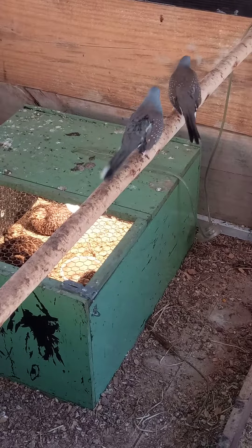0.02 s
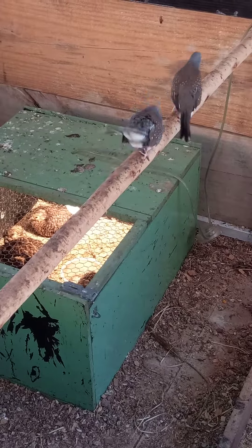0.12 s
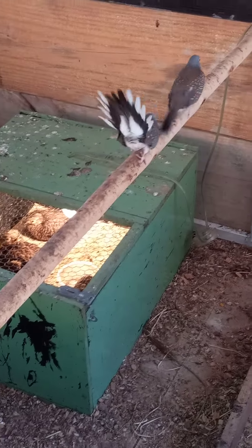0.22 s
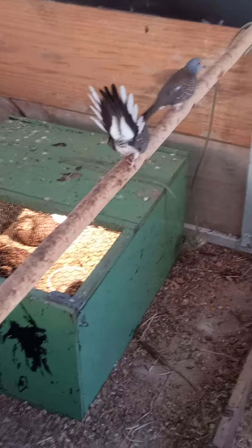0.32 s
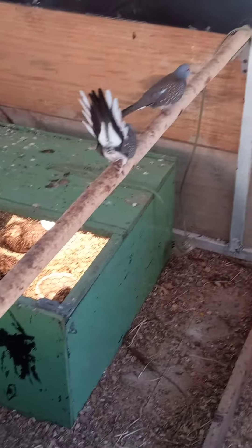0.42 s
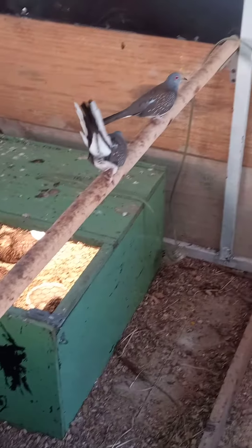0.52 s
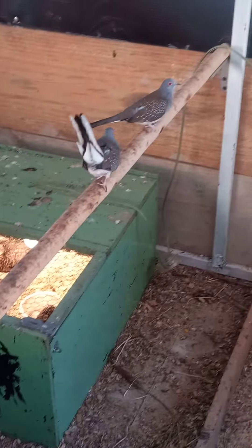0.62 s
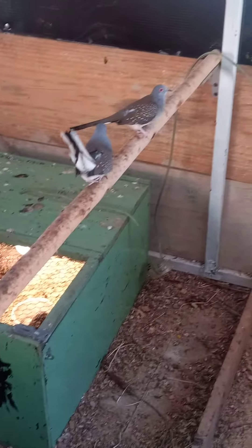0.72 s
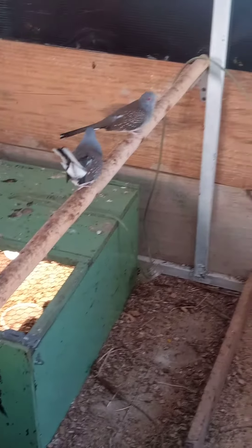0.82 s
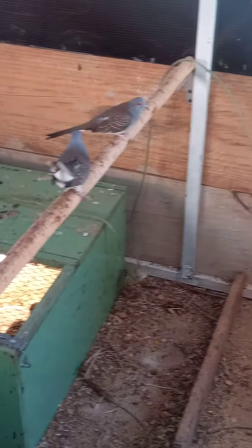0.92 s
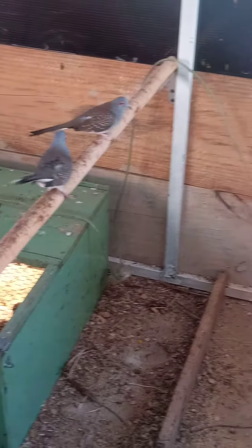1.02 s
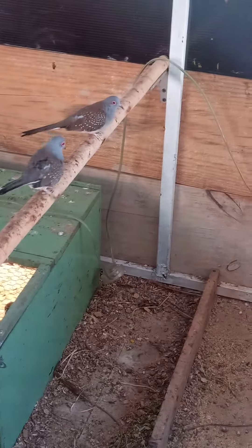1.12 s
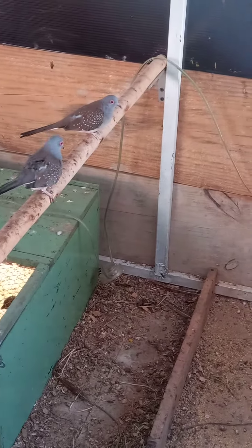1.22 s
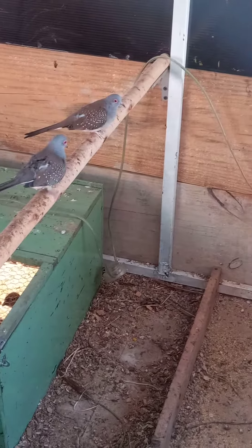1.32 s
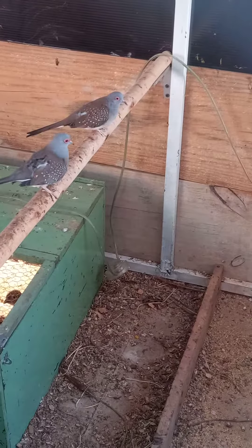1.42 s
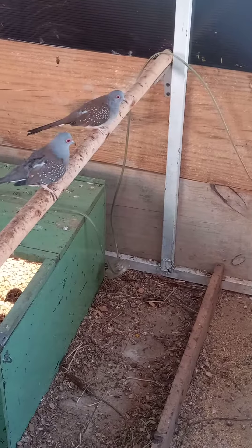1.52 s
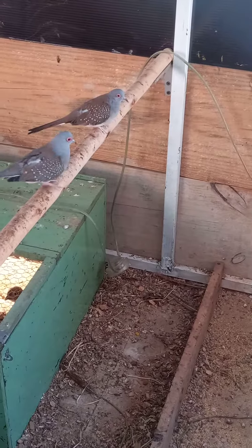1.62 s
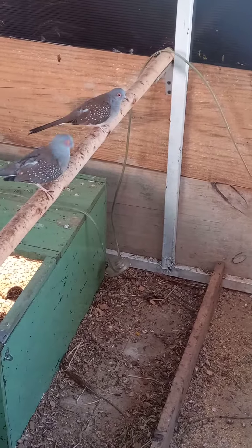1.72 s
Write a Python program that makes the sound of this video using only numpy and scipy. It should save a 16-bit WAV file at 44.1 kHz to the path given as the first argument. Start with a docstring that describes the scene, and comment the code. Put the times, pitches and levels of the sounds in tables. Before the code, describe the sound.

A small dove close by gives one high coo, rough, then pure, then rough and falling, in a small wooden aviary; another dove hums before it, with light perch knocks, a feather rush and distant small birds' whistles.

```python
"""In a wooden aviary a small dove gives one coo: a rough start, a pure held note, a rough falling end.
The coo is two beating tones, jittered where rough and filtered by the throat. Perch knocks are noise
bursts with ringing modes, thumps are low swelling sines, feathers are shaped noise. Small birds give
swept whistles and raspy chips further off, another dove hums faintly, and rumble lies under it all."""
import sys
import numpy as np
from scipy import signal
from scipy.fft import rfft, irfft, next_fast_len
from scipy.io import wavfile
from scipy.ndimage import map_coordinates

SR = 44100
rng = np.random.default_rng(int(sys.argv[2]) if len(sys.argv) > 2 else 0)


def unload_wav(signal):
    """Save mono or channel-first audio to the path in sys.argv[1] as 16-bit WAV at rate SR, clipped to [-1, 1]."""
    wavfile.write(
        sys.argv[1],
        SR,
        np.round(np.clip(np.atleast_2d(signal).T, -1, 1) * 32767).astype(np.int16),
    )


N = 79380  # samples

# low rumble: spectrum (pitch_hz, relative_db) and course (time_s, level_db)
RUMBLE_SPECTRUM = [(20, -43.5), (40, -18), (75, 0.5), (110, -4), (145, -5.5), (190, -10), (400, -16),
                   (700, -22), (1200, -26), (3000, -48)]
RUMBLE_LEVEL = [(0, -67.5), (.3, -63), (.75, -65.5), (1.1, -73), (1.8, -72.5)]
# air noise: spectrum (pitch_hz, relative_db) and course (time_s, level_db)
AIR_SPECTRUM = [(300, -6), (1000, -6), (1400, -5), (2100, 6), (2350, 0), (2700, -9.5), (3200, -12.5),
                (4300, -3.5), (5300, -14.5), (6800, -9.5), (7400, -28), (15000, -27.5)]
AIR_LEVEL = [(0, -78.5), (.15, -85), (.3, -72.5), (.9, -70), (1.15, -75.5), (1.5, -73.5), (1.8, -76)]
# steady microphone hiss: spectrum (pitch_hz, relative_db)
HISS_SPECTRUM = [(3000, -17.5), (7000, -7.5), (7500, -6.5), (10000, -3.5), (13000, 3), (15500, -1)]
HISS_DB = -87.5

# small birds' slurred whistles, level before the reverberation
# (start_s, length_s, start_hz, end_hz, level_db, warble_share_of_pitch)
WHISTLES = [(-.015, 0.039, 5010, 5100, -75.5, 0.031), (0.295, 0.057, 4597, 4060, -63.5, 0.056),
            (0.632, 0.07, 4600, 4123, -60, 0.072), (0.671, 0.066, 3720, 3500, -67, 0.075),
            (0.789, 0.055, 4593, 4100, -63, .08), (1.38, 0.075, 4480, 4150, -65, .055),
            (1.45, 0.077, 3780, 3420, -73.5, .07), (1.472, 0.04, 4320, 4280, -68.5, .022),
            (1.582, 0.049, 4310, 4500, -71.5, .05), (1.572, 0.06, 3600, 3517, -77.5, 0.046)]
# their short raspy chips (start_s, level_db, gain_of_lower_resonance_db)
CHIPS = [(.292, -77, -13), (0.475, -68, -12.5), (0.766, -64.5, 2.5), (0.906, -77.5, 6.5), (1.034, -70.5, 5),
         (1.329, -67, 3.5), (1.592, -80, -5)]
# noise spectrum of the chips (pitch_hz, relative_db)
CHIP_SPECTRUM = [(2500, -33.5), (3800, -10), (4500, -3.5), (5300, -12), (5900, -14), (6170, 2), (6500, -10),
                 (6850, -5), (7300, -23), (8600, -20.5), (10000, -26.5), (15000, -22.5)]
# fluttering tones within each chip (pitch_hz, relative_db)
CHIP_LINES = [(4480, -7), (6144, -7.5), (6750, -12)]
WARBLE_RATE = 800  # random knots a second
CHIP_ATTACK_S, CHIP_HOLD_S, CHIP_T60_S = 0.011, 0.024, 0.45
CHIP_SPLIT_HZ = 6100  # between the lower and the upper resonance

# soft low thumps (centre_s, pitch_hz, level_db, length_s)
THUMPS = [(0.063, 129.8, -61.5, 0.095), (0.221, 85, -55.5, 0.033), (0.223, 132.5, -60, 0.042),
          (0.315, 69.6, -66.5, .03), (0.486, 91.6, -57.5, 0.03), (0.564, 87.3, -61, 0.044),
          (0.692, 85, -59, 0.05), (0.96, 89.3, -55.5, 0.026), (1.201, 80.3, -65.5, 0.045),
          (1.389, 82.6, -65, 0.097), (1.421, 114.8, -68, 0.078)]

# knocks and scuffs on the perch (start_s, level_db)
KNOCKS = [(0.126, -75), (.3, -60.5), (0.326, -58), (.535, -74.5), (.66, -74), (0.809, -60), (0.834, -73),
          (0.945, -75)]
# noise spectrum of a knock (pitch_hz, relative_db)
KNOCK_SPECTRUM = [(200, -18), (500, 8), (1000, 2), (1400, 0.5), (1700, 4.5), (2300, -1), (2700, -15.5),
                  (4000, -21), (7000, -31.5), (14000, -43.5)]
# ringing modes of the wood (pitch_hz, relative_db, t60_s)
KNOCK_MODES = [(1710, -6, 0.84), (2190, -8, 0.74)]
KNOCK_RISE_S, KNOCK_HOLD_S, KNOCK_T60_S = 0.0032, 0.026, 0.45

# another dove, far off (time_s, pitch_hz, level_db)
FAR_COO = [(.14, 385, -78), (.18, 402, -63.5), (.23, 433.4, -59.5), (.28, 429.5, -56), (.31, 426, -99)]

# main tone of the coo, level before the throat (time_s, pitch_hz, level_db, roughness_0_to_1)
COO = [(.199, 814.7, -77.5, .4), (.214, 820.7, -49, .4), (.234, 840.7, -36.5, .4), (.26, 800.2, -41.5, .6),
       (.282, 833, -33.5, .6), (.298, 806, -43, .7), (.306, 822.5, -33, .5), (.325, 799, -37.5, 0.9),
       (.344, 787, -44.5, .9), (.37, 843.5, -34, .25), (.445, 846, -31.5, 0.05), (.5, 828.3, -33.5, 0.05),
       (.58, 822.1, -38, 0.05), (.645, 839, -36, 0.05), (.688, 832, -32, 0.05), (.699, 784.5, -39.5, 0.4),
       (.71, 819, -30.5, 0.25), (.733, 770, -30, 0.3), (.787, 785.5, -30.5, 0.4), (.806, 799.3, -43.5, .6),
       (.832, 763, -33, 0.4), (.862, 783.7, -46.5, .7), (.89, 806, -45, 0.9), (.925, 803, -62, 0.9)]
# lower tone beating against it in the opening and closing breaks (time_s, pitch_hz, level_db)
UNDER_START = [(.19, 659, -73.5), (.207, 667.1, -50), (.25, 652, -49), (0.286, 664.9, -43),
               (.308, 671.7, -40), (.324, 642.5, -36.5), (.34, 698.3, -38.5), (0.365, 676, -47),
               (.389, 668.4, -37), (.412, 648, -49), (.475, 660, -62)]
UNDER_END = [(.684, 657, -62), (0.695, 675.7, -41.5), (0.721, 668, -52), (0.75, 668, -40.5),
             (0.789, 657.4, -36.5), (0.808, 655, -44), (0.84, 644.8, -42), (0.884, 633.4, -44.5),
             (.919, 668.5, -55)]
# balance of the lower tone, opening then closing (left_minus_right_db)
UNDER_PANS_DB = [0, -1]
# sidebands (multiple_of_lower_pitch, relative_db)
SIDEBANDS = [(0.722, -9.5), (1.5, -1)]
# response of the throat (pitch_hz, gain_db)
THROAT = [(300, -45), (480, -34), (570, -13.5), (620, 0.5), (850, -0.5), (900, -10.5), (1000, -15.5),
          (1150, -25), (2000, -51.5)]
# instants at which the voice catches (centre_s)
CATCHES_S = [.29, .3025, .352, .695, .701, .803]
CATCH_WIDTH_S, CATCH_DEPTH = 0.003, 0.7
ROUGH_RATE = 240  # random knots a second
JITTER_TURNS, SHIMMER = 0.13, 0.33  # scatter at full roughness: timing in cycles, size as a share
SIDEBAND_ROUGH, UNDER_FLUTTER = 0.6, 0.75  # roughness of the sidebands and of the lower tone
SIDEBAND_DB, OVERTONE_DB = -22.5, -55
HALFWAY_DB = -4  # halfway tone at full roughness, against the weaker of its two parents
COO_PAN_DB, COO_LAG_S = 1.5, 0.0001  # the bird sits a little off centre
ROOM_T60_S, COO_ROOM_DB, FAR_T60_S = 0.2194, -7.5, 0.46

# rush of feathers: course (time_s, level_db) and spectrum (pitch_hz, relative_db)
FEATHERS = [(.45, -96), (.5, -63.5), (.545, -57), (.6, -58.5), (.635, -60.5), (.7, -74)]
FEATHER_SPECTRUM = [(200, 2.5), (1000, 2), (2200, -16.5), (3000, -11), (4400, -3), (5500, -5), (6800, -8.5),
                    (7500, -40.5), (10000, -24), (15000, -19)]
FEATHER_LEFT_DB = -14.5  # gain of the left channel alone
# air buffeting the right port: course (time_s, level_db) and spectrum (pitch_hz, relative_db)
DRAUGHT = [(.46, -85), (.51, -61.5), (.54, -46), (.565, -53), (.585, -49), (.62, -54.5), (.65, -72)]
DRAUGHT_SPECTRUM = [(25, -38.5), (60, 3), (100, 3), (150, -5.5), (220, -17), (500, -17.5), (1200, -49.5)]

# colour of the two microphone ports (pitch_hz, left_minus_right_db)
PORTS = [(60, -3), (700, -1.5), (1000, -4), (1300, -5.5), (2100, -17.5), (3000, 0.5), (4300, -13),
         (5200, 3), (6300, 15.5), (7500, 12.5), (8600, 4), (11000, 0.5)]
TOP_HZ = 15700  # band limit


def amp(db):
    """Logarithmic level: decibels become an amplitude gain."""
    return 10 ** (np.asarray(db) / 20)


def unit(x):
    """Normalisation: root mean square becomes 1."""
    return x / np.sqrt(np.mean(x ** 2) + 1e-20)


def unit_pair(balance_db):
    """Constant-power panning: left and right gains for a left-minus-right balance."""
    pair = amp(np.array([balance_db, -balance_db]) / 2)
    return pair / np.sqrt(np.mean(pair ** 2, axis=0))


def clock():
    """Uniform sampling: the time of each sample in seconds."""
    return np.arange(N) / SR


def along(points, hz):
    """Interpolation of (pitch_hz, value) points on a logarithmic frequency axis."""
    point_hz, values = np.transpose(points)
    return np.interp(np.log(hz + 1), np.log(point_hz + 1), values)


def curves(rows):
    """Linear interpolation in time: one curve for each column after the first."""
    times, *columns = np.transpose(rows)
    return [np.interp(clock(), times, column) for column in columns]


def during(rows):
    """Gaussian gating: 1 within a table's time span, fading softly outside."""
    t = clock()
    outside_s = np.maximum(0, np.maximum(rows[0][0] - t, t - rows[-1][0]))
    return np.exp(-(outside_s / 0.009) ** 2)


def wobble(rate):
    """Band-limited randomness: a smooth curve through random knots, rate of them a second."""
    return map_coordinates(rng.standard_normal(8000), [clock() * rate + 2], mode="mirror")


def filtered(x, gain):
    """Linear filtering: the spectrum is multiplied by a response of frequency."""
    size = next_fast_len(N + SR // 2)
    response = gain(np.fft.rfftfreq(size, 1 / SR))
    return irfft(rfft(x, size) * response, size)[..., :N]


def noise(spectrum):
    """Coloured random noise of rms 1, uncorrelated between the two channels."""
    white = rng.standard_normal((2, N))
    return unit(filtered(white, lambda hz: amp(along(spectrum, hz))))


def turning(hz):
    """Phase accumulation: a unit phasor that follows a pitch curve."""
    return np.exp(2j * np.pi * np.cumsum(hz) / SR)


def burst(s, rise, hold, t60):
    """Impulsive excitation: linear attack, hold, then exponential decay by 60 dB in t60."""
    t = clock() - s
    return np.clip(t / rise, 0, 1) * amp(-60 * np.maximum(t - rise - hold, 0) / t60)


def room(x, t60):
    """Diffuse reverberation: convolution with decaying noise stands for the aviary's walls."""
    t = np.arange(SR // 2) / SR
    tail = rng.standard_normal((2, len(t))) * amp(-60 * t / t60)
    return signal.fftconvolve(x[None], tail / np.linalg.norm(tail[0]), axes=1)[:, :N]


def roughened(tone, rough):
    """Jitter and shimmer: unsteady vibration scatters a tone's timing and size."""
    r = np.clip(rough, 0, 1)
    jitter = np.exp(2j * np.pi * JITTER_TURNS * r * wobble(ROUGH_RATE))
    shimmer = 1 + SHIMMER * r * wobble(ROUGH_RATE)
    return tone * jitter * shimmer


def background(side_db=-7):
    """Channel correlation: a nearly mono rumble lies under uncorrelated air noise and hiss."""
    mid, side = noise(RUMBLE_SPECTRUM)
    rumble = amp(curves(RUMBLE_LEVEL)[0]) * (mid + amp(side_db) * np.array([side, -side]))
    air = amp(curves(AIR_LEVEL)[0]) * noise(AIR_SPECTRUM)
    return rumble + air + amp(HISS_DB) * noise(HISS_SPECTRUM)


def whistles():
    """Frequency modulation: each pitch glides and warbles, then reverberation smears it."""
    out = np.zeros((2, N))
    for s, length, start_hz, end_hz, db, warble in WHISTLES:
        progress = np.clip((clock() - s) / length, 0, 1)
        glide = start_hz + (end_hz - start_hz) * progress
        hz = glide * (1 + warble * wobble(WARBLE_RATE))
        envelope = np.sqrt(2 * np.abs(np.sin(np.pi * progress)))
        out += amp(db) * room(envelope * turning(hz).real, FAR_T60_S)
    return out


def rasp(flutter_rate=40):
    """Random modulation: fluttering tones within a band of noise make the chips' voice."""
    tones = np.zeros((2, N))
    for hz, db in CHIP_LINES:
        flutter = np.array([wobble(flutter_rate) + 1j * wobble(flutter_rate) for _ in range(2)])
        tones += amp(db) * (flutter * np.exp(2j * np.pi * hz * clock())).real
    return unit(noise(CHIP_SPECTRUM) + tones)


def chips():
    """Two-resonance source: the raspy voice is split in two bands; overlapping bursts add in power."""
    voice = rasp()
    lower = filtered(voice, lambda hz: hz < CHIP_SPLIT_HZ)
    upper_power, lower_power = 0, 0
    for s, db, lower_db in CHIPS:
        envelope = amp(db) * burst(s, CHIP_ATTACK_S, CHIP_HOLD_S, CHIP_T60_S)
        upper_power = upper_power + envelope ** 2
        lower_power = lower_power + (amp(lower_db) * envelope) ** 2
    return np.sqrt(upper_power) * (voice - lower) + np.sqrt(lower_power) * lower


def thumps():
    """Gaussian tone bursts: dull low swells a few cycles long, alike in both channels."""
    t = clock()
    out = np.zeros(N)
    for s, hz, db, length in THUMPS:
        swell = np.exp(-2 * ((t - s) / length) ** 2)
        out += amp(db) * swell * np.sqrt(2) * np.sin(2 * np.pi * (hz * t + rng.random()))
    return out


def perch():
    """Modal excitation: each knock is a woody noise scuff with a faint decaying ring."""
    out = np.zeros((2, N))
    for s, db in KNOCKS:
        scuff = burst(s, KNOCK_RISE_S, KNOCK_HOLD_S, KNOCK_T60_S) * noise(KNOCK_SPECTRUM)
        out += amp(db) * scuff
        for hz, mode_db, t60 in KNOCK_MODES:
            ring = np.sin(2 * np.pi * (hz * clock() + rng.random((2, 1))))
            out += amp(db + mode_db) * burst(s, KNOCK_RISE_S, 0, t60) * ring
    return out


def far_dove(pan_db=5, room_db=-10):
    """Direct and reverberant sound: a faint low rising hoot, stronger on the left."""
    hz, db = curves(FAR_COO)
    call = amp(db) * during(FAR_COO) * unit(roughened(turning(hz), 0.38).real)
    return call * amp([[pan_db], [-pan_db]]) + amp(room_db) * room(call, ROOM_T60_S)


def catches():
    """Amplitude modulation: gain of the voice, with brief dips where it catches."""
    gaps = sum(np.exp(-((clock() - s) / CATCH_WIDTH_S) ** 2) for s in CATCHES_S)
    return 1 - np.clip(CATCH_DEPTH * gaps, 0, 1)


def dove():
    """Coupled sources: two vibrating membranes beat and intermodulate; the swollen throat filters.

    Roughness adds a tone halfway between them; loudness adds faint sidebands."""
    hz, db, rough = curves(COO)
    carrier = turning(hz)
    effort = amp(db) * during(COO)
    main = effort * roughened(carrier, rough)
    voice = main * unit_pair(COO_PAN_DB)[:, None]
    reedy = amp(OVERTONE_DB) * main * carrier  # second harmonic; this part bypasses the throat
    for rows, pan_db in zip((UNDER_START, UNDER_END), UNDER_PANS_DB):
        low_hz, low_db = curves(rows)
        strength = amp(low_db) * during(rows)
        halfway_level = amp(HALFWAY_DB) * rough * np.minimum(strength, effort)
        halfway = halfway_level * roughened(turning((hz + low_hz) / 2), 0.95)
        low = strength * roughened(turning(low_hz), UNDER_FLUTTER)
        voice = voice + (low + halfway) * unit_pair(pan_db)[:, None]
        for ratio, side_db in SIDEBANDS:
            loudness = amp(SIDEBAND_DB + side_db + db - db.max())
            sideband = roughened(turning(ratio * low_hz), SIDEBAND_ROUGH)
            reedy = reedy + loudness * np.sqrt(strength * effort) * sideband
    throated = filtered(voice.real * catches(), lambda f: amp(along(THROAT, f)))
    call = np.sqrt(2) * (throated + reedy.real)
    # half the lag delays the left channel, half advances the right
    sides = np.array([[1], [-1]])
    direct = filtered(call, lambda f: np.exp(-1j * np.pi * f * COO_LAG_S * sides))
    return direct + amp(COO_ROOM_DB) * room(call.mean(axis=0), ROOM_T60_S)


def feathers(left_port_db=-20):
    """Turbulent noise: feathers swish while a puff of air buffets mainly the right port."""
    swish = amp(curves(FEATHERS)[0]) * during(FEATHERS) * noise(FEATHER_SPECTRUM)
    puff = amp(curves(DRAUGHT)[0]) * during(DRAUGHT) * noise(DRAUGHT_SPECTRUM)
    return swish * amp([[FEATHER_LEFT_DB], [0]]) + puff * amp([[left_port_db], [0]])


def scene():
    """Superposition: all that sounds in the aviary adds linearly."""
    birds = dove() + far_dove() + whistles() + chips()
    return birds + perch() + thumps() + feathers() + background()


def record(dry):
    """Receiver response: two ports colour the sound differently, up to a sharp band limit."""
    return filtered(dry, lambda hz: unit_pair(along(PORTS, hz)) * (hz < TOP_HZ))


dry = scene()
out = record(dry)
unload_wav(out)
```